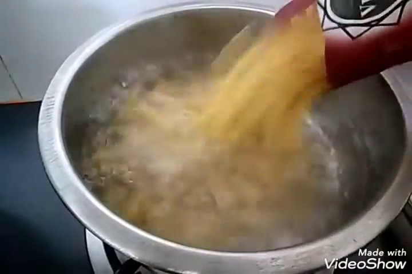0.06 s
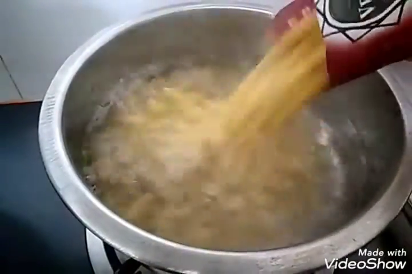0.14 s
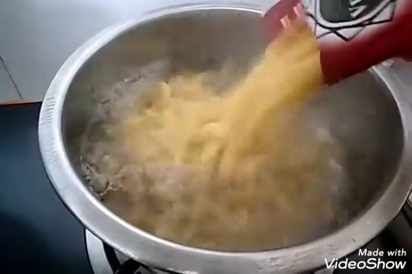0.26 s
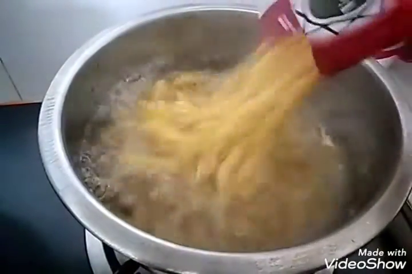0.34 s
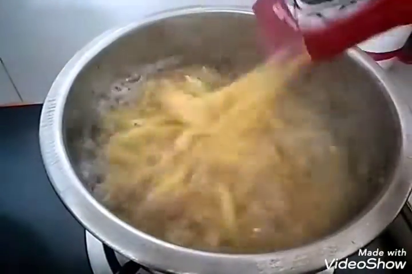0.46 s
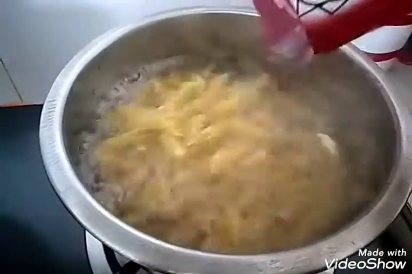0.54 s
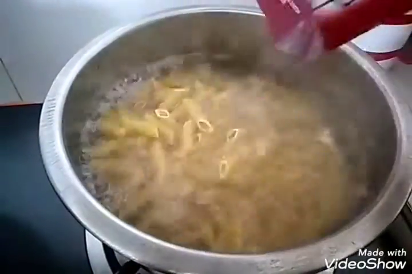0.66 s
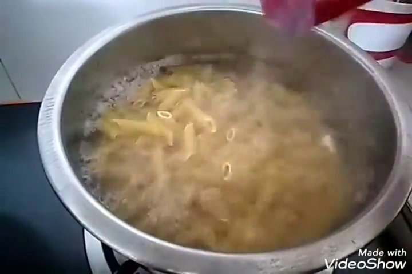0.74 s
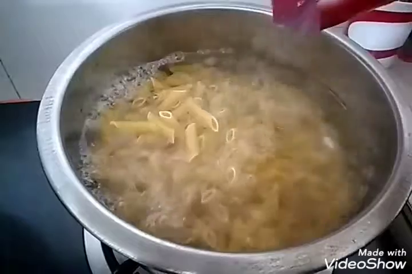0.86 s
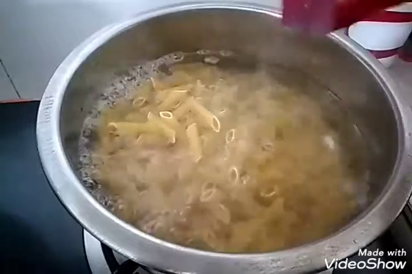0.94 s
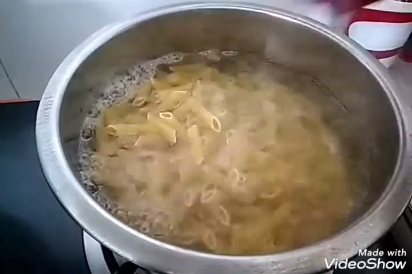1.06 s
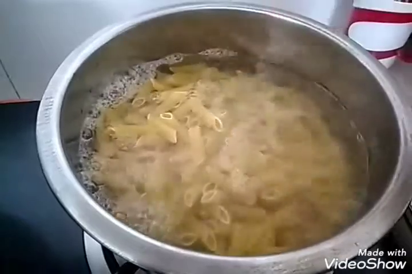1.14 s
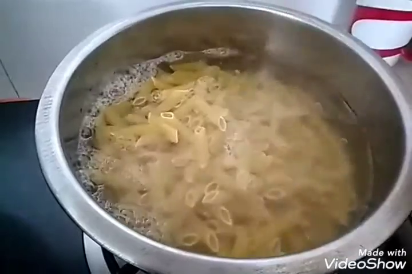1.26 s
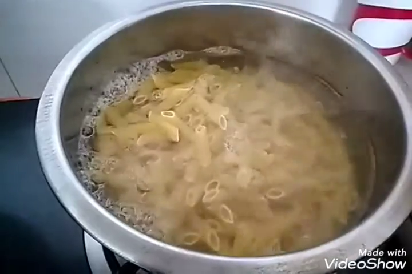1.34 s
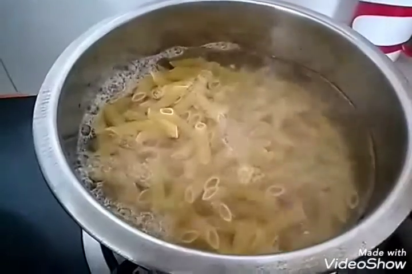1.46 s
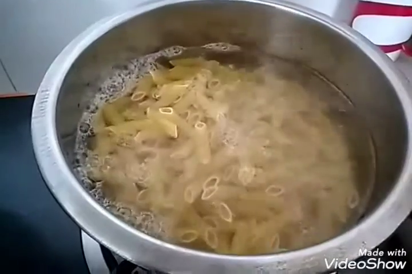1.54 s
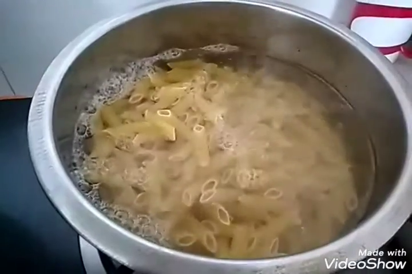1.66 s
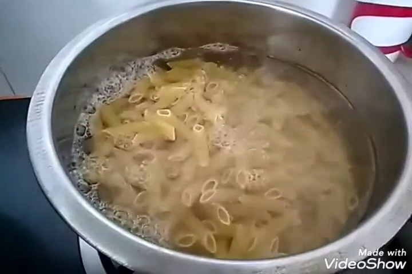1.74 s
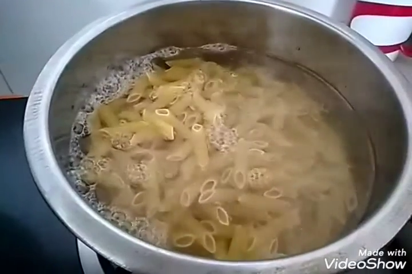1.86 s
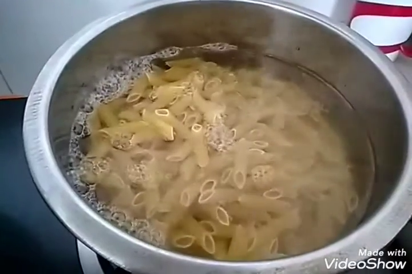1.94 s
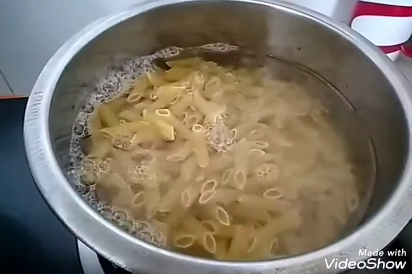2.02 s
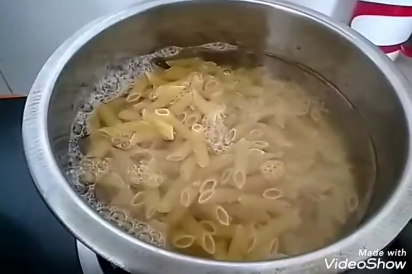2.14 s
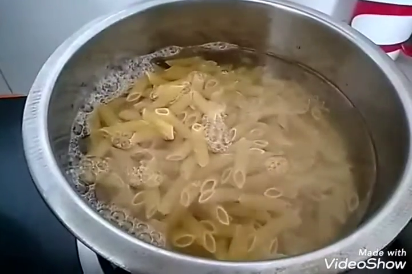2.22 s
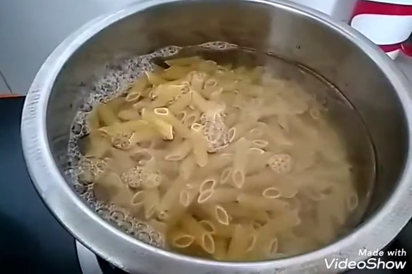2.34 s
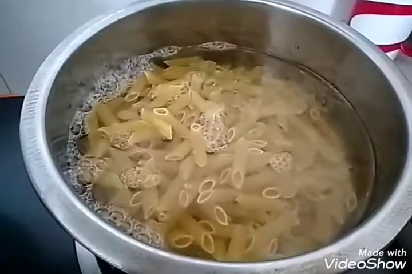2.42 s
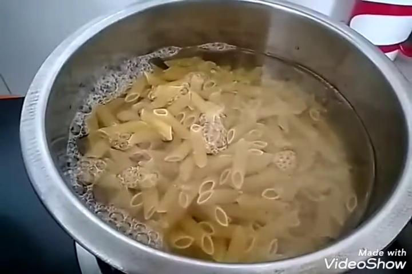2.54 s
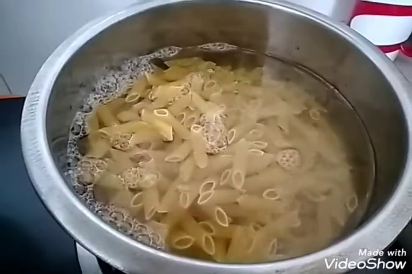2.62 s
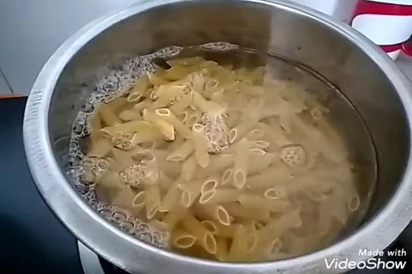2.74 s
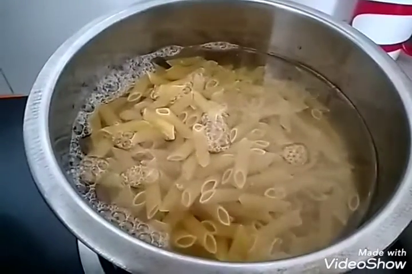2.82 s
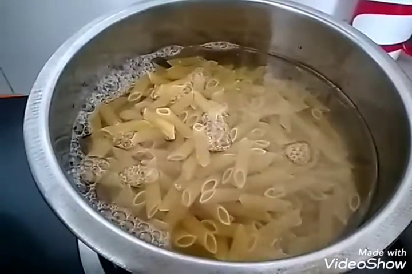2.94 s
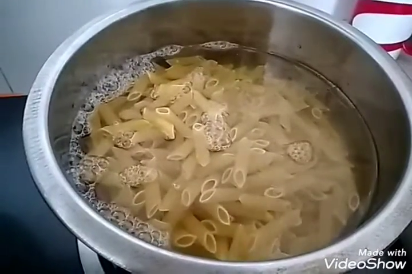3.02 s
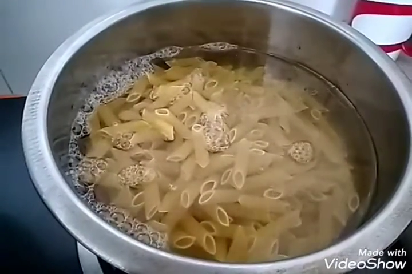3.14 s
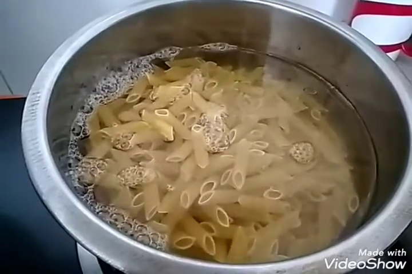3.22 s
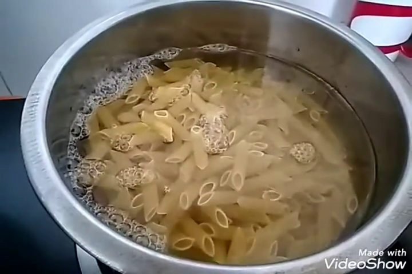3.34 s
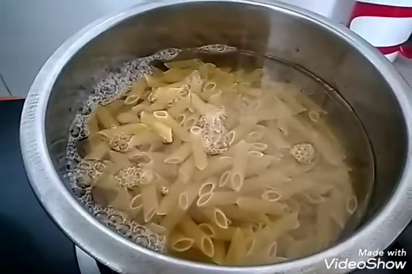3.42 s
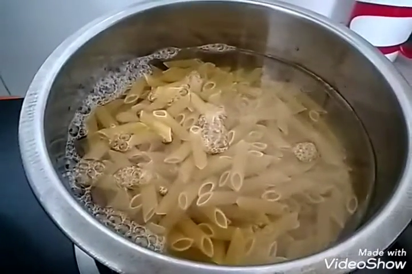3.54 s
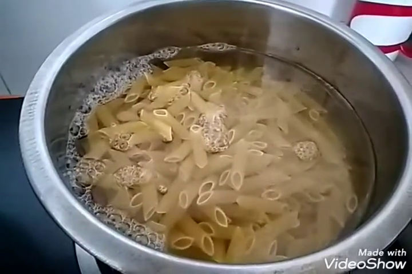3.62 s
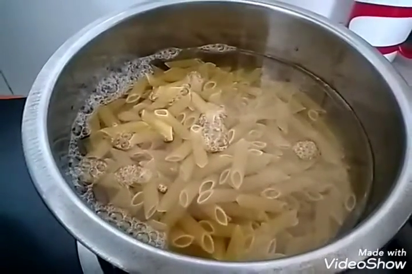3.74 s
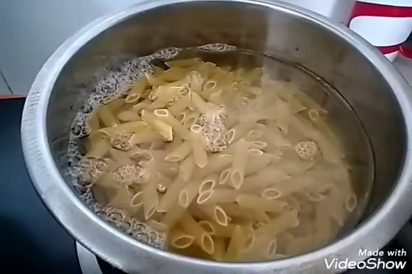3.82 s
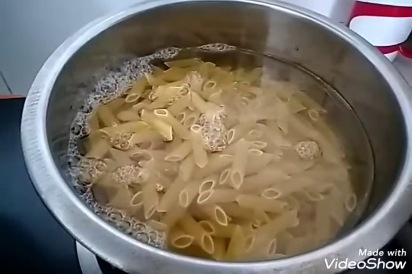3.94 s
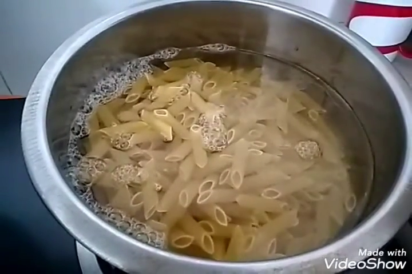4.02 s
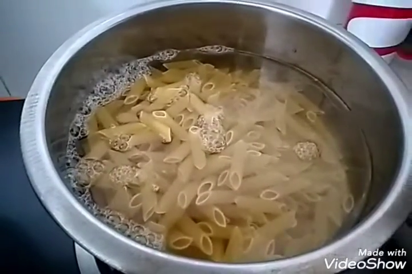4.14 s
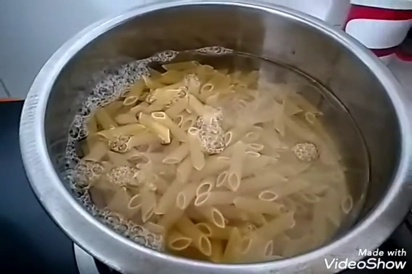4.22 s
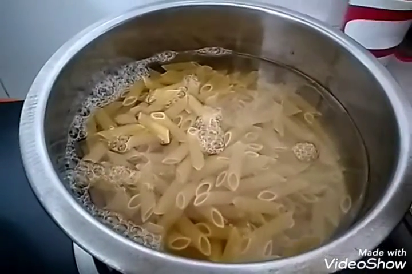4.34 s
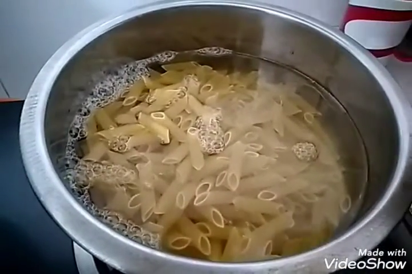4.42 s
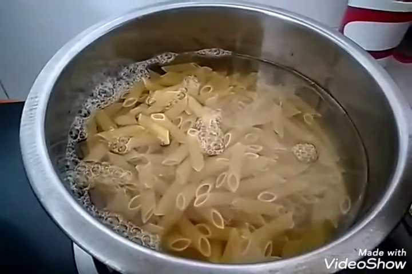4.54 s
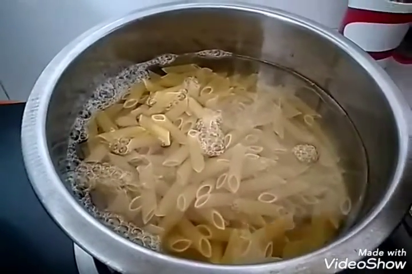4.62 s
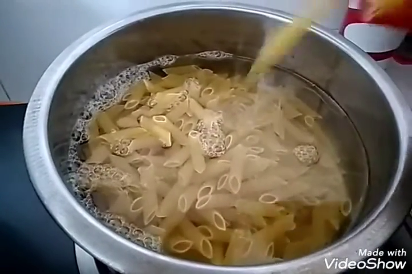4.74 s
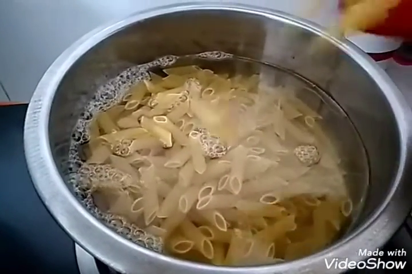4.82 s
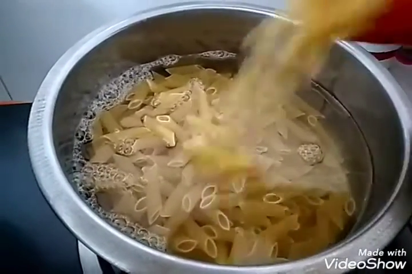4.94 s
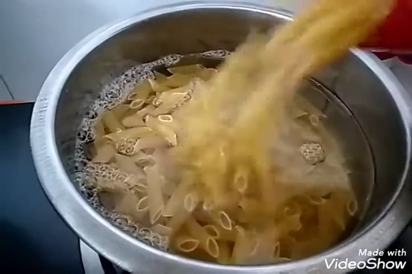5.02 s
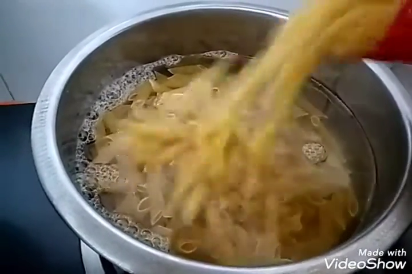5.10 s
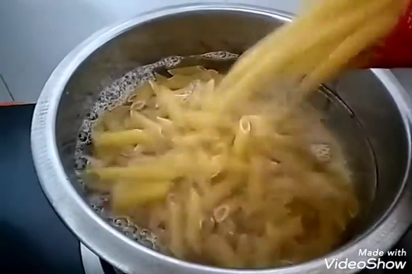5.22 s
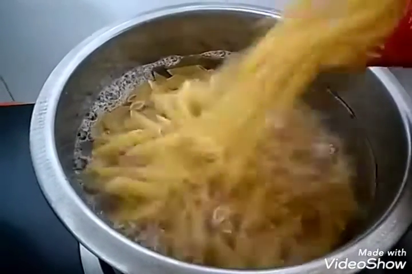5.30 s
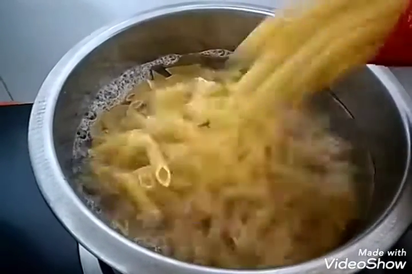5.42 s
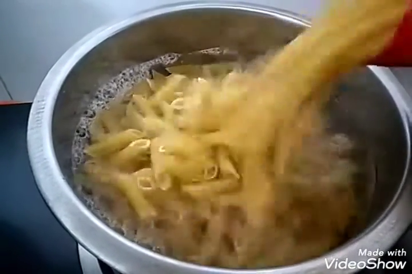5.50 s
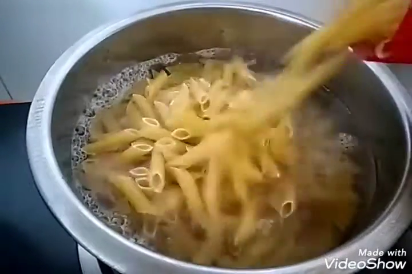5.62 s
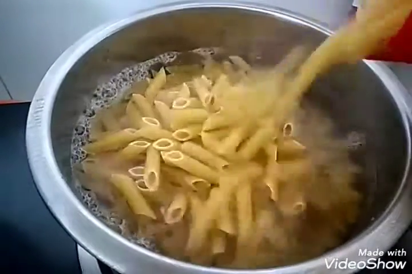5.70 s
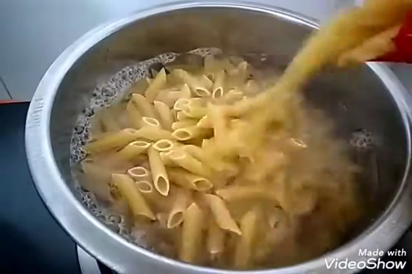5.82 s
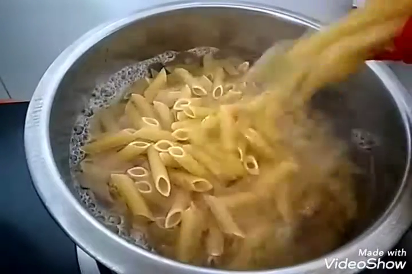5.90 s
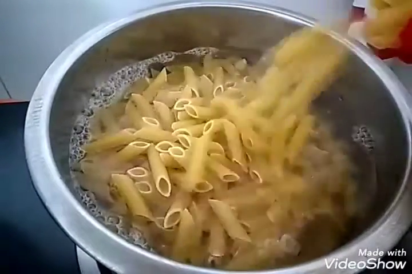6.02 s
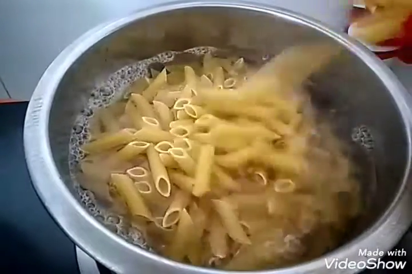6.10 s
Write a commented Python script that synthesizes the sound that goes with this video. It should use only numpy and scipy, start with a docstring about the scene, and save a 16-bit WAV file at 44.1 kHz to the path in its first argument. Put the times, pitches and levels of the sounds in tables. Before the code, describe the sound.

Two loud pours of dry pasta into hot water in a metal pot, separated by sharp crackling of a plastic packet over faint bubbling.

```python
"""Pasta poured into a simmering pot

Dry pasta tubes clatter and splash into a steel pot in two pours, their contacts made of short noise
bursts and rings. Between the pours a plastic packet rustles, flexes and snaps: filtered noise and ticks.
Underneath, noise and rising sine bubbles make the simmer, with a faint steel ring and a brief low hum.
A small kitchen answers all but the simmer's rumble and fizz, and a phone picks it up from close by.
"""
import sys
import numpy as np
from scipy import signal
from scipy.fft import rfft, irfft, next_fast_len
from scipy.io import wavfile
from scipy.ndimage import uniform_filter1d, map_coordinates

SR = 44100
rng = np.random.default_rng(int(sys.argv[2]) if len(sys.argv) > 2 else 0)


def wav_out(sig):
    """Save sig, one row per channel (or a flat mono array), as 16-bit PCM at SR to the path in sys.argv[1]."""
    wavfile.write(sys.argv[1], SR, np.round(np.clip(np.atleast_2d(sig).T, -1, 1) * 32767).astype(np.int16))


N = 271656

# All levels in the tables are relative: the layers that use them set the final balance.

# Rumble of the boil. Each row: time in seconds, level in dB.
SIMMER_LEVEL = [(0, -42), (.4, -58), (.55, -56), (1.8, -59), (3.1, -62), (4.05, -55.5), (4.25, -51),
                (4.95, -54.5), (5.2, -45), (6.16, -53)]
# Tone of the boil's rumble. Each row: frequency in Hz, level in dB.
RUMBLE_COLOUR = [(20, -48), (40, -17), (70, 4), (130, 1), (240, -1), (340, 3.5), (600, 2), (1500, -31),
                 (5000, -42)]
# Tone of the fine fizz at the wall. Each row: frequency in Hz, level in dB.
FIZZ_COLOUR = [(200, -12), (350, 19.5), (600, -1), (1500, -1), (2800, -22), (4500, -26), (6500, -24),
               (8000, 2), (9500, 16.5), (11500, 9), (13000, -13), (16000, -35)]
# Surges of small bubbles bursting. Each row: time in seconds, level in dB.
BUBBLE_SURGES = [(.65, -63), (1.25, -46.5), (1.4, -56.5), (2.0, -74), (2.15, -59), (2.8, -46.5), (3.0, -76),
                 (3.15, -53.5), (3.55, -46), (3.7, -59.5), (4.05, -54.5), (4.2, -44), (4.9, -64)]
# Tone of cracking foam films. Each row: frequency in Hz, level in dB.
FOAM_COLOUR = [(500, -13), (1300, -4), (2500, 3), (4500, -6.5), (6500, -7), (9000, -14), (14000, -16.5)]
FOAM_DB, FOAM_GROWS = -58.5, 0.55  # level at the top of a surge; exponent by which foam follows it

# The brief, wavering low hum
HUM_S, HUM_LENGTH_S, HUM_DB = 1.88, 0.16, -49.5
HUM_HZ, HUM_SAG_HZ_PER_S, HUM_WAVER_HZ = 361, 120, 11

# Modes of the singing steel. Each row: frequency in Hz, width in Hz, level in dB.
RIM_MODES = [(2510, 45, -6), (2840, 26, 2), (3100, 26, 0), (3200, 28, 2), (3390, 26, 1), (3650, 16, 11),
             (4050, 29, -11)]
RING_S, RING_HOLD_S, RING_ATTACK_S = 1.494, 0.45, 0.04  # start, whole length, fade at either end
RING_DB, RING_DB_PER_S = -48, 24  # level at the start and how fast it sinks
WASH_HZ, WASH_WIDTH_HZ, WASH_DB = 3080, 470, -52  # soft noise band around the modes
SIZZLE_DB = -53  # thin hiss alongside the ring

# Decay of the kitchen's echo. Each row: frequency in Hz, t60 in seconds.
KITCHEN_T60 = [(200, 0.12), (2000, 0.07), (12000, 0.18)]

# Large bubbles, and two short clear rings near 2.2 kHz. Each row: start in seconds, pitch in Hz,
# level in dB, life in seconds, share by which the pitch climbs in one life.
CLEAR_TONES = [(0.055, 1377, -18, 0.075, 0.022), (.30, 2247, -11.5, 0.047, 0.073),
               (.385, 2200, -11.5, 0.053, 0.02), (0.572, 1470, -14, 0.021, .03),
               (0.607, 1580, -20, 0.018, .15), (2.153, 1016, -21, 0.025, .06),
               (3.507, 1400, -25, 0.018, .05), (5.578, 1470, -21, 0.054, 0.066),
               (5.66, 876, -25, 0.052, 0.097), (5.708, 1350, -23, 0.026, 0.072),
               (5.738, 1280, -21, 0.019, .06), (5.783, 1095, -26, 0.029, .05),
               (5.972, 966, -21, 0.058, .09), (5.996, 1090, -22.5, .045, .6)]
TONE_ATTACK = 0.12  # time constant of a tone's swell, as a share of its life

# Bunches slapping the water. Each row: start in seconds, peak level in dB.
WATER_SLAPS = [(0.0661, -7), (0.109, -12.5), (5.344, -15), (5.457, -13.5), (5.657, -11.5), (6.061, -12.5)]

# Dull knocks of pasta shifting in the packet. Each row: start in seconds, peak level in dB.
PACKET_KNOCKS = [(0.651, -29), (3.539, -34.5), (4.209, -22), (4.237, -18.5), (4.308, -27), (4.799, -40)]
# Tone of those knocks. Each row: frequency in Hz, level in dB.
THUD_COLOUR = [(25, -24), (60, -12), (110, 1), (260, 0.5), (500, -0.5), (1000, -2.5), (3000, -36)]

# Rustles as the packet is gripped and turned. Each row: crest in seconds, level in dB,
# swell in seconds, fade in seconds.
PACKET_RUSTLES = [(.79, -38.5, 0.45, 0.093), (.945, -34.5, 0.021, 0.024), (1.11, -36.5, 0.099, 0.13),
                  (1.3, -49, 0.09, 0.37), (1.51, -44, 0.013, 0.028), (1.9, -41.5, 0.084, 0.12),
                  (2.04, -39.5, 0.049, 0.17), (2.19, -35.5, 0.068, 0.09), (2.41, -40, 0.21, 0.44),
                  (2.62, -39, 0.24, 0.084), (2.76, -34.5, 0.37, 0.088), (2.93, -42.5, 0.056, 0.11),
                  (3.172, -32, 0.078, 0.13), (3.53, -34, 0.26, 0.098), (3.85, -53.5, 0.28, 0.51),
                  (4.19, -32, 0.11, 0.3), (4.349, -36.5, 0.14, 0.064), (4.52, -32.5, 0.02, 0.024),
                  (4.66, -34, 0.095, 0.53), (4.88, -41, 0.67, 0.27)]
RUSTLE_DROP_DB = 14.5  # below the crest after one swell or fade time
# Tone of the crinkling plastic. Each row: frequency in Hz, level in dB.
CRINKLE_COLOUR = [(1500, -12), (3500, -8), (5000, 4.5), (6500, -0.5), (9000, 9), (11000, 4), (13000, -0.5),
                  (16000, -48)]
# Tone of the flexing sheet. Each row: frequency in Hz, level in dB.
FLEX_COLOUR = [(120, -12.5), (400, -6.5), (900, 1.5), (1500, 1.5), (2100, 1.5), (2900, 1), (4500, -1),
               (8000, -20)]
FLEX_DB, FLEX_GROWS = -10.5, 0.82  # the soft rush grows more slowly than the crinkling

# The loudest creases. Each row: time in seconds, peak level in dB, left-right difference in dB,
# ring in Hz.
LOUD_SNAPS = [(0.65, -2.5, 1, 11900), (0.691, -13.5, -1.5, 3260), (0.783, -24.5, -5, 9560),
              (0.817, -22.5, -7, 1830), (0.86, -29, -4, 3470), (0.934, -21, -7, 1640),
              (1.014, -18.5, -3, 8600), (1.0495, -23, -3, 8470), (1.062, -30, -5, 3410),
              (1.08, -13.5, 2, 3400), (1.104, -13, -4, 8850), (1.112, -16.5, 1, 3120),
              (1.116, -14, -3, 4070), (1.128, -22, -2, 2600), (1.163, -15.5, 0, 1650),
              (1.168, -22, 1.5, 9210), (1.202, -16.5, -2, 8700), (1.236, -19.5, 10, 3620),
              (1.252, -22.5, 2, 1500), (1.301, -28, 4, 1400), (1.317, -34, 12, 2170),
              (1.424, -32, -2, 2980), (1.898, -26.5, -6, 8900), (2.016, -23, -5, 2780),
              (2.033, -23, 2, 2440), (2.134, -12, -1, 2950), (2.193, -21, -4, 2430),
              (2.33, -20.5, -4, 8900), (2.371, -29, 0, 1710), (2.386, -18, -4, 2660), (2.398, -20, 0, 9000),
              (2.408, -19, 0, 8900), (2.413, -19, 0, 2500), (2.464, -24, 0, 5550), (2.488, -21, -2, 1680),
              (2.583, -24, -2, 4180), (2.666, -15, -4, 1780), (2.683, -22, 0, 1740),
              (2.735, -15.5, 3, 2000), (2.801, -25, -1, 9500), (2.9016, -23, 6, 1510),
              (2.9087, -13, -1, 10000), (2.971, -27, 2, 9490), (3.072, -14, 0, 9400), (3.134, -20, 4, 2190),
              (3.1455, -18, 1, 9620), (3.15, -23, -2, 2220), (3.178, -20.5, 3, 10000),
              (3.296, -18, 4, 9150), (3.399, -18, 0, 9600), (3.422, -22, -6, 1490), (3.453, -16.5, 0, 3930),
              (3.508, -17, 2, 1430), (3.558, -20, 1, 1350), (3.664, -31, -4, 3600), (3.815, -34, 6, 1260),
              (3.93, -23, 1.5, 2460), (4.017, -26, 1, 9000), (4.06, -25, 7, 1290), (4.088, -34, 2, 2000),
              (4.149, -22.5, 0, 1310), (4.1957, -24, 11, 1600), (4.211, -10, 2, 7750),
              (4.236, -8.5, 2, 9800), (4.262, -13, -3, 9650), (4.291, -11, 4, 2680),
              (4.304, -11.5, -3, 8850), (4.429, -19.5, 0, 10600), (4.461, -9.5, -2, 3000),
              (4.473, -12, 6, 10000), (4.577, -3.5, -4, 8100), (4.7135, -14, -1, 9600),
              (4.714, -11, -1, 1770)]
# Tone of a crease's tick. Each row: frequency in Hz, level in dB.
SNAP_COLOUR = [(500, -8), (2000, 3), (4000, 4), (6500, 1), (9000, 8), (11500, 5), (13500, -28),
               (16000, 5.5)]
SNAP_DB, SHEET_DB, SHEET_GROWS = 3, -21.5, 0.5  # tick gain; sheet gain; sheet dB per dB of snap
# Weaker creases: how often, least level over the rustle, range above that
SMALL_SNAPS_PER_S, SMALL_SNAP_DB, SMALL_SPREAD_DB = 26, 3.5, 9.5

# Single tubes striking hard. Each row: time in seconds, peak level in dB, ring in Hz,
# t60 of the strike in seconds.
HARD_CLACKS = [(0.0276, -3, 4000, 0.018), (0.0422, -10, 3290, 0.01), (0.0677, -5.5, 3400, 0.02),
               (0.1084, -6.5, 3360, .02), (0.1401, -8, 10900, 0.022), (0.169, -8, 4010, 0.024),
               (0.2114, -9, 10500, 0.025), (0.264, -9, 4270, .015), (0.292, -5.5, 2260, 0.023),
               (0.356, -6, 4160, 0.035), (0.4317, -3, 11100, .012), (0.448, -8.5, 2350, 0.04),
               (0.4858, -8, 3480, .01), (0.543, -6.5, 3870, 0.015), (0.582, -16, 1450, 0.018),
               (4.9407, -4.5, 5900, 0.011), (4.9843, -4.5, 7400, 0.016), (4.9916, -11, 3780, 0.022),
               (5.0223, -12, 11500, .012), (5.0335, -4.5, 4320, 0.034), (5.047, -8.5, 4600, 0.027),
               (5.103, -6, 10800, .014), (5.1375, -2, 10900, 0.017), (5.17, -2, 10300, 0.011),
               (5.217, -12, 11500, 0.017), (5.234, -4, 11000, 0.023), (5.275, -7, 11900, 0.013),
               (5.297, -3.5, 9970, 0.036), (5.342, -3.5, 3300, 0.036), (5.4307, -5, 3360, 0.026),
               (5.5004, -8, 9550, .03), (5.5487, -2.5, 10700, 0.029), (5.574, -12, 9900, 0.011),
               (5.601, -3, 10800, .04), (5.6254, -17, 11000, 0.018), (5.647, -5, 9530, 0.016),
               (5.673, -1.5, 10500, 0.025), (5.709, -6, 10600, .012), (5.7193, -6, 10900, 0.019),
               (5.737, -1, 10300, 0.051), (5.787, -10, 5440, 0.011), (5.8272, -10, 10300, 0.027),
               (5.8982, -6, 9150, .03), (5.9352, -6, 9300, 0.022), (5.953, -2, 8550, 0.025),
               (6, -5, 11600, .025), (6.033, -16, 11200, .015), (6.079, -2.5, 11500, 0.035)]
# Tone of dry pasta. Each row: frequency in Hz, level in dB.
PASTA_COLOUR = [(1060, -46), (1800, -9), (2060, -13.5), (2240, -9), (2720, -3.5), (3380, 0), (4920, -0.5),
                (6360, -7), (8360, -0.5), (10700, 1.5), (11900, -3.5), (13700, -16), (16000, -18)]

# The first pour. Each row: time in seconds, clatter level in dB, splash level in dB.
FIRST_POUR = [(0.0, -20, -24.5), (0.018, -25, -27), (0.028, -20, -26.5), (0.064, -22.5, -26.5),
              (0.26, -17, -26.5), (0.378, -17.5, -24.5), (0.445, -19.5, -27), (0.535, -27.5, -30.5),
              (0.586, -42.5, -37.5), (0.608, -56, -45), (0.64, -56, -48)]
# The second pour. Each row: time in seconds, clatter level in dB, splash level in dB.
SECOND_POUR = [(4.88, -34.5, -50), (4.93, -29.5, -39.5), (5.015, -27, -40.5), (5.058, -21, -34.5),
               (5.15, -20, -33.5), (5.164, -20.5, -38), (5.225, -16.5, -30.5), (5.262, -24.5, -38.5),
               (5.338, -13.5, -33.5), (5.415, -19.5, -32.5), (5.465, -13, -35.5), (5.52, -13.5, -31),
               (5.562, -22, -35.5), (5.615, -13.5, -30), (5.69, -24.5, -35.5), (5.84, -23, -36),
               (5.888, -34, -42.5), (5.9, -25, -37), (5.94, -22.5, -40.5), (5.99, -26.5, -31.5),
               (6.016, -18, -36), (6.028, -25, -44), (6.08, -20, -31), (6.144, -31.5, -44),
               (6.16, -12, -29)]
CLATTER_DB, SPLASH_DB = -3, 2  # trims on both pours
# Tone of the splashing. Each row: frequency in Hz, level in dB.
SPLASH_COLOUR = [(30, -30), (80, -13.5), (250, -19), (450, -14), (660, -7), (880, 0.5), (1130, -1),
                 (1450, 3.5), (1900, -1.5), (2300, 0), (4000, -3.5), (6000, -12.5), (12000, -30)]
# Wall and hollow of the pot. Each row: frequency in Hz, width in Hz, level in dB.
POT_MODES = [(975, 84, -3), (1500, 81, -12), (2300, 200, 13.5), (2940, 85, -22), (3110, 300, 13),
             (4020, 200, 11.5)]

# Tone of the phone's two ports. Each row: frequency in Hz, left-right difference in dB.
PORT_BALANCE = [(200, 1.5), (800, 3), (1400, 1.5), (4000, -0.5), (7000, 1), (9200, 3.5), (11000, -2),
                (12700, -8.5), (16000, -1.5)]
# Stereo width at the phone. Each row: frequency in Hz, side gain in dB.
SIDE_GAIN = [(40, 6), (130, 9.5), (300, 6), (650, 4), (1000, 1.5), (1400, -1), (3000, -0.5), (7000, 0)]
TOP_HZ = 15900  # upper limit of the phone, and of the random contact pitches


def amp(db):
    """Decibels to gain."""
    return 10 ** (np.asarray(db) / 20)


def unit(x):
    """A stereo pair scaled so that its middle has rms 1."""
    return x / np.sqrt(np.mean(x.mean(0) ** 2) + 1e-20)


def pan(db):
    """Left and right gains for a level difference."""
    return amp(np.array([[db], [-db]]) / 2)


def along(points, hz):
    """Read a curve of (Hz, value) points on a log frequency axis."""
    f, v = np.transpose(points)
    return np.interp(np.log(hz + 1), np.log(f + 1), v)


def levels(rows):
    """A gain per sample for each dB column, fading out beyond the ends."""
    s, *columns = np.transpose(rows)
    t = np.arange(N) / SR
    fade = np.clip(1 + np.minimum(t - s[0], s[-1] - t) / 0.065, 0, 1)
    return [fade * amp(np.interp(t, s, column)) for column in columns]


def filtered(x, response):
    """Multiply the spectrum of x by a response of frequency."""
    n = x.shape[-1]
    m = next_fast_len(n + n // 8, True)
    return irfft(rfft(x, m) * response(np.fft.rfftfreq(m, 1 / SR)), m)[..., :n]


def coloured(x, spectrum, size=2048):
    """A causal minimum-phase filter with the given tone, so that attacks stay sharp."""
    gain = amp(along(spectrum, np.fft.rfftfreq(size, 1 / SR)))
    cepstrum = irfft(np.log(gain))
    # fold the cepstrum onto positive time
    cepstrum[1:size // 2] *= 2
    cepstrum[size // 2 + 1:] = 0
    impulse = irfft(np.exp(rfft(cepstrum)))
    return signal.oaconvolve(x, impulse[None], axes=1)[:, :x.shape[1]]


def resonate(x, modes):
    """Ring x through resonances given as (Hz, width Hz, dB)."""
    def response(f):
        return sum(amp(db) * 1j * f * w / (c * c - f * f + 1j * f * w) for c, w, db in modes)
    return filtered(x, response)


def add(track, s, sound):
    """Mix a sound into a track at time s."""
    part = track[:, max(0, round(s * SR)):][:, :sound.shape[1]]
    part += sound[:, :part.shape[1]]


def hiss():
    """Unrelated white noise on both sides."""
    return unit(rng.standard_normal((2, N)))


def scatter(starts, grains):
    """Sum grains (side, grain, sample) at their start samples."""
    where = (starts[:, None] + np.arange(grains.shape[2])).ravel()
    return unit(np.array([np.bincount(where, side.ravel(), N)[:N] for side in grains]))


def ticks(rate, spread_db, t60, ring, size=320):
    """Random contacts: each is a burst of reflections with a short ring at its own pitch."""
    count = int(rate * N / SR)
    when, strength, pitch, left, right = rng.random((count, 5)).T
    t = np.arange(size) / SR
    start_phase = np.array([left, right])[:, :, None]
    tone = np.sin(2 * np.pi * (pitch[:, None] * TOP_HZ * t + start_phase))
    burst = rng.standard_normal((2, count, size)) + ring * tone
    loudness = amp(spread_db * strength ** 2)[:, None]
    return scatter((when * N).astype(int), burst * loudness * amp(-60 * t / t60))


def bubbles(rate, centre_hz, cycles, rise, size=700):
    """Trapped air rings and climbs in pitch as it nears the surface, dying over a few cycles."""
    count = int(rate * N / SR)
    when, strength, left, right = rng.random((count, 4)).T
    hz = centre_hz * np.exp(0.429 * rng.standard_normal((count, 1)))
    turns = hz * np.arange(size) / SR
    age = turns / cycles
    start_phase = np.array([left, right])[:, :, None]
    tone = np.sin(2 * np.pi * (turns * (1 + rise * np.minimum(age, 4)) + start_phase))
    envelope = np.exp(-age) * (1 - np.exp(-turns)) * amp(10 * strength)[:, None]
    return scatter((when * N).astype(int), tone * envelope)


def crack(t60, tail_db, tail_t60, spike):
    """One impact: a first spike, close reflections that build within a millisecond, a diffuse tail."""
    t = np.arange(SR // 8) / SR
    decay = amp(-60 * t / t60) + amp(tail_db - 60 * t / tail_t60)
    echoes = decay * (1 - np.exp(-t / 0.0007))
    return rng.standard_normal((2, len(t))) * (spike * np.exp(-t / 0.00028) + echoes)


def peaked(x, crest_db=9):
    """Scale an impact by the power of its loudest two milliseconds, so that it peaks near 1."""
    power = uniform_filter1d(np.mean(x ** 2, 0), SR // 500)
    return x / np.sqrt(power.max() / 2) / amp(crest_db)


def simmer():
    """Water rumbles unevenly over the burner, and fine foam fizzes steadily at the wall."""
    rumble, = levels(SIMMER_LEVEL)
    boil = hiss() + amp(-17.5) * bubbles(rate=60, centre_hz=348.5, cycles=2.6, rise=0.036)
    fizz = ticks(rate=200, spread_db=14, t60=.006, ring=1.2) + amp(3) * hiss()
    return rumble * unit(coloured(boil, RUMBLE_COLOUR)) + amp(-59) * unit(coloured(fizz, FIZZ_COLOUR))


def kitchen(x):
    """Tiled walls answer after 5 ms with a short diffuse tail; its lower treble dies first."""
    noise = rng.standard_normal((2, SR // 3))
    hz, t, bands = signal.stft(noise, SR, nperseg=256)
    decay = amp(-60 * t / along(KITCHEN_T60, hz)[:, None])
    tail = signal.istft(bands * decay, SR, nperseg=256)[1]
    tail = np.pad(tail / np.linalg.norm(tail[0]), ((0, 0), (SR // 200, 0)))
    return signal.fftconvolve(x, tail, axes=1)[:, :N]


def hum():
    """A faint low hum swells, sags in pitch, wavers and fades."""
    count = int(HUM_LENGTH_S * SR)
    t = np.arange(count) / SR
    waver = map_coordinates(rng.standard_normal(64), [t * 90], mode="wrap")
    hz = HUM_HZ - HUM_SAG_HZ_PER_S * t + HUM_WAVER_HZ * waver
    tone = np.sin(2 * np.pi * np.cumsum(hz) / SR)
    out = np.zeros((2, N))
    add(out, HUM_S, pan(1.5) * amp(HUM_DB) * signal.windows.tukey(count, .5) * tone)
    return out


def noise_band(hz, width):
    """Hiss narrowed by two equal resonances in a row."""
    mode = [(hz, width, 0)]
    return unit(resonate(resonate(hiss(), mode), mode))


def rim():
    """The steel sings faintly and unevenly in a soft wash, sinking under a thin hiss until it stops."""
    t = np.arange(N) / SR - RING_S
    gate = np.clip(np.minimum(t, RING_HOLD_S - t) / RING_ATTACK_S, 0, 1)
    ring = amp(RING_DB) * unit(resonate(hiss(), RIM_MODES))
    wash = amp(WASH_DB) * noise_band(WASH_HZ, WASH_WIDTH_HZ)
    sinking = amp(-RING_DB_PER_S * np.abs(t))
    return gate * (sinking * (ring + wash) + amp(SIZZLE_DB) * noise_band(9700, 2300))


def blips():
    """Small round bubbles burst all over the simmering surface, and foam films crack between them."""
    surge, = levels(BUBBLE_SURGES)
    films = ticks(rate=110, spread_db=16, t60=.006, ring=1.5)
    foam_gain = amp(FOAM_DB) * (surge / surge.max()) ** FOAM_GROWS
    crackle = foam_gain * unit(coloured(films, FOAM_COLOUR))
    return surge * bubbles(rate=170, centre_hz=1450, cycles=4, rise=0.025) + crackle


def clear_tones():
    """Clear tones swell out of the splashing: decaying sines that glide upwards ever faster."""
    out = np.zeros((2, N))
    t = np.arange(SR // 6) / SR
    for s, hz, db, life, rise in CLEAR_TONES:
        age = t / life
        glide = hz * (1 + rise * np.minimum(age, 2) ** 2)
        tone = np.sin(2 * np.pi * np.cumsum(glide) / SR)
        swell = 1 - np.exp(-age / TONE_ATTACK)
        add(out, s, pan(-8) * amp(db + 2 - 49 * age) * swell * tone)
    return out


def slaps():
    """A bunch of tubes hits open water and sounds the hollow of the pot."""
    out = np.zeros((2, N))
    for s, db in WATER_SLAPS:
        hit = coloured(crack(t60=.07, tail_db=-24, tail_t60=.12, spike=.3), SPLASH_COLOUR)
        add(out, s, amp(db - 4) * peaked(resonate(hit, [(1070, 1400, 0)])))
    return pan(-4) * out


def knocks():
    """The load shifts in the packet with a dull thud."""
    out = np.zeros((2, N))
    for s, db in PACKET_KNOCKS:
        push = crack(t60=.08, tail_db=-24, tail_t60=.25, spike=1)
        add(out, s, amp(db + 1.5) * peaked(coloured(push, THUD_COLOUR)))
    return out


def rustle():
    """Gain of the packet's rustle: each grip swells and fades, and their powers add."""
    t = np.arange(N) / SR
    power = np.zeros(N)
    for s, db, swell, fade in PACKET_RUSTLES:
        distance = np.maximum((s - t) / swell, (t - s) / fade)
        power += amp(db - RUSTLE_DROP_DB * distance) ** 2
    return np.sqrt(power)


def packet():
    """The plastic flexes with a soft rush and crinkles in many small buckles."""
    crinkle = rustle()
    flex = amp(FLEX_DB) * crinkle ** FLEX_GROWS
    buckles = unit(ticks(rate=330, spread_db=19, t60=.012, ring=.8) + amp(-3.5) * hiss())
    sheet = unit(buckles + amp(-2.5) * hiss())
    bright = amp(-4) * crinkle * unit(coloured(buckles, CRINKLE_COLOUR))
    soft = flex * unit(coloured(sheet, FLEX_COLOUR))
    return pan(1) * (bright + soft)


def tick(hz):
    """A crease flips with a bright tick and a ring pitched by its size; large, low ones ring more."""
    flip = crack(t60=.012, tail_db=-34, tail_t60=.1, spike=1.4)
    ring_db = -3 - 0.8 * np.log2(hz / 9000)
    ring = unit(resonate(flip, [(hz, hz / 5, 0)]))
    return peaked(unit(coloured(flip, SNAP_COLOUR)) + amp(ring_db) * ring)


def snaps():
    """Loud creases also move the whole sheet; weaker ones come at random and follow the rustle."""
    out, strength = np.zeros((2, N)), rustle()
    for s, db, side_db, hz in LOUD_SNAPS:
        body = peaked(coloured(crack(t60=0.059, tail_db=-3, tail_t60=0.086, spike=0.29), FLEX_COLOUR))
        snap = amp(db + SNAP_DB) * tick(hz) + amp(SHEET_DB + SHEET_GROWS * db) * body
        add(out, s + .0008, pan(side_db) * snap)  # starts 0.8 ms after the listed time
    for when, force, size, side in rng.random((int(SMALL_SNAPS_PER_S * N / SR), 4)):
        gain = strength[int(when * N)] * amp(SMALL_SNAP_DB + SMALL_SPREAD_DB * force)
        add(out, when * N / SR, pan(4 * (2 * side - 1)) * gain * tick(1200 * 8 ** size))
    return out


def clacks():
    """Single tubes hit harder than the rest, each with its own short ring."""
    out = np.zeros((2, N))
    for s, db, hz, t60 in HARD_CLACKS:
        hit = coloured(crack(t60=t60, tail_db=-26, tail_t60=.08, spike=.8), PASTA_COLOUR)
        tube = resonate(hit, [(hz, hz / 9, 0)])
        clack = peaked(unit(hit) + amp(-3) * unit(tube))
        add(out, s + .0008, amp(db - 3.5) * clack)  # starts 0.8 ms after the listed time
    return pan(-7) * out


def pour():
    """The stream of tubes clatters on the heap and splashes; the pot rings along."""
    clatter, splash = np.add(levels(FIRST_POUR), levels(SECOND_POUR))
    # many glancing contacts, fewer head-on hits that also slap the water, and some tubes that ring
    glancing = ticks(rate=750, spread_db=13, t60=.009, ring=1.3)
    head_on = ticks(rate=320, spread_db=6, t60=.014, ring=.5)
    ringing = ticks(rate=160, spread_db=5, t60=.016, ring=3.5)
    contacts = glancing + amp(-3) * head_on + amp(-3) * ringing + amp(-16) * hiss()
    trapped_air = bubbles(rate=380, centre_hz=1600, cycles=8.9, rise=0.047)
    water = unit(head_on + amp(-3.5) * hiss() + amp(-11) * trapped_air)
    pot = unit(resonate(water, POT_MODES))
    wet = amp(-2) * unit(coloured(water, SPLASH_COLOUR)) + amp(-7) * pot
    dry_tubes = pan(-2.9) * amp(CLATTER_DB) * clatter * unit(coloured(contacts, PASTA_COLOUR))
    return dry_tubes + pan(-4) * amp(SPLASH_DB) * splash * wet


def scene():
    """The stove with its echo, the snapping packet closer and drier, rumble and fizz without echo."""
    pot = blips() + rim() + clear_tones() + slaps()
    stove = hum() + pot + knocks() + packet() + clacks() + pour()
    close = snaps()
    echo = amp(-4.5) * kitchen(stove + amp(-4.5) * close)
    return simmer() + echo + stove + close


def record(dry):
    """The phone widens the bass, colours its two ports differently, clips peaks and cuts the top."""
    mid = dry.mean(0)
    side = filtered(dry[0] - mid, lambda hz: amp(along(SIDE_GAIN, hz)))
    ports = lambda hz: amp(np.outer([1, -1], along(PORT_BALANCE, hz)) / 2)
    pair = np.clip(filtered(np.array([mid + side, mid - side]), ports), -1, 1)
    return filtered(pair, lambda hz: hz < TOP_HZ)


dry = scene()
out = record(dry)
wav_out(out)
```